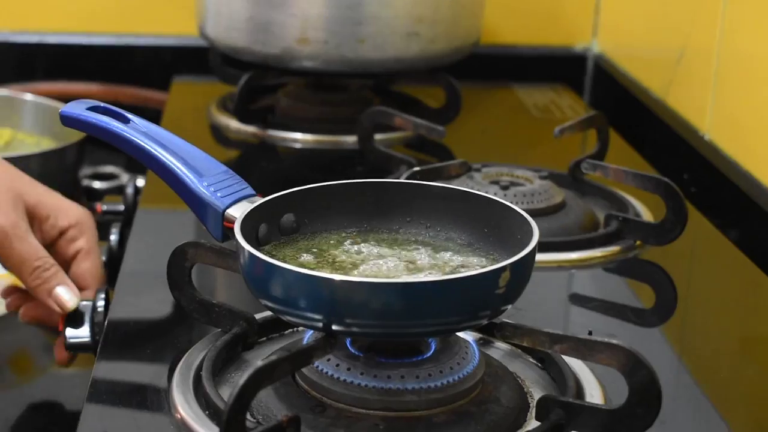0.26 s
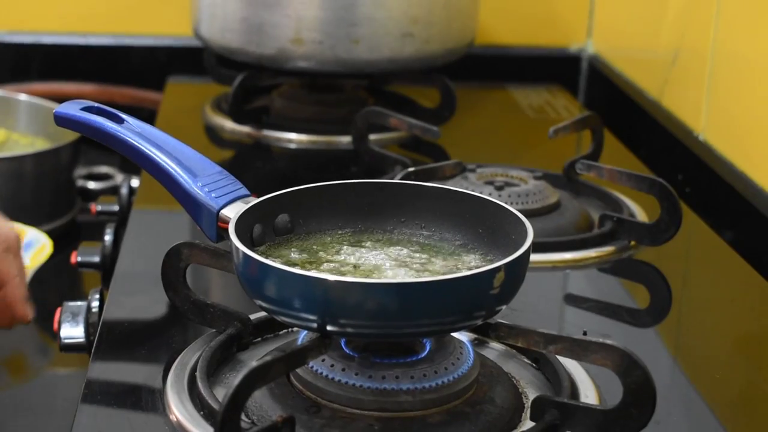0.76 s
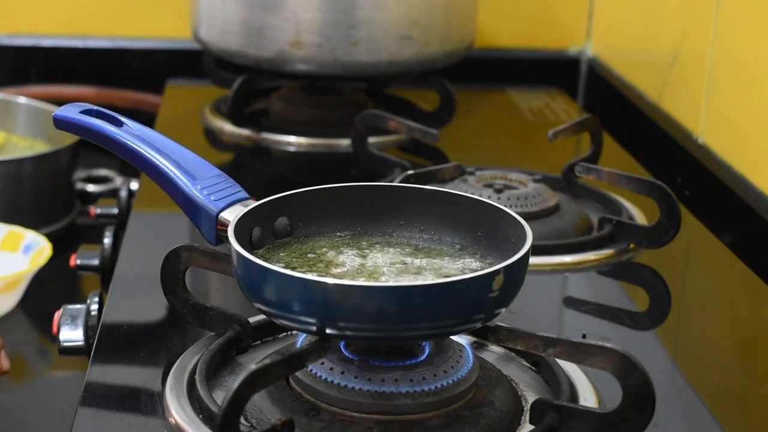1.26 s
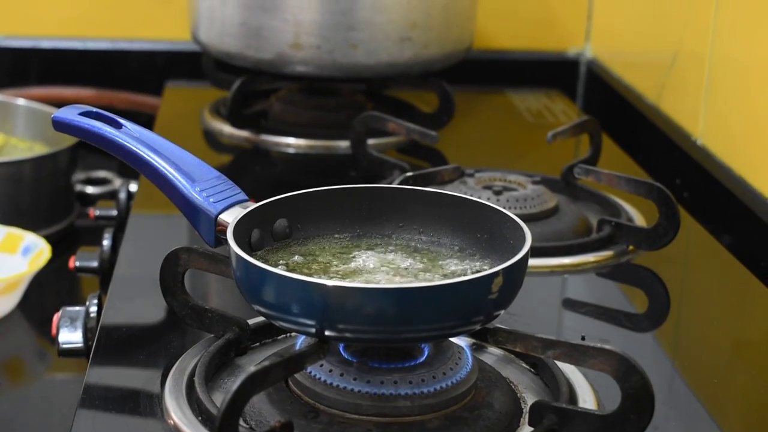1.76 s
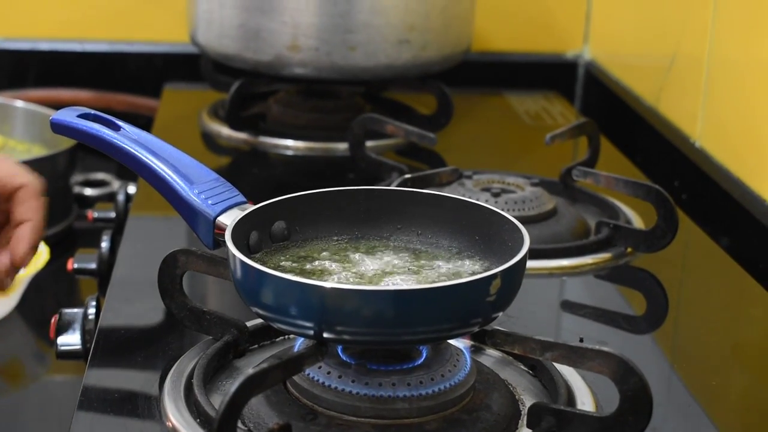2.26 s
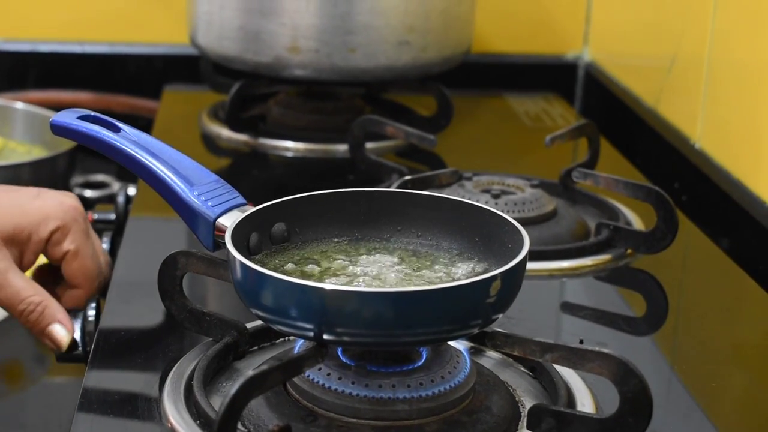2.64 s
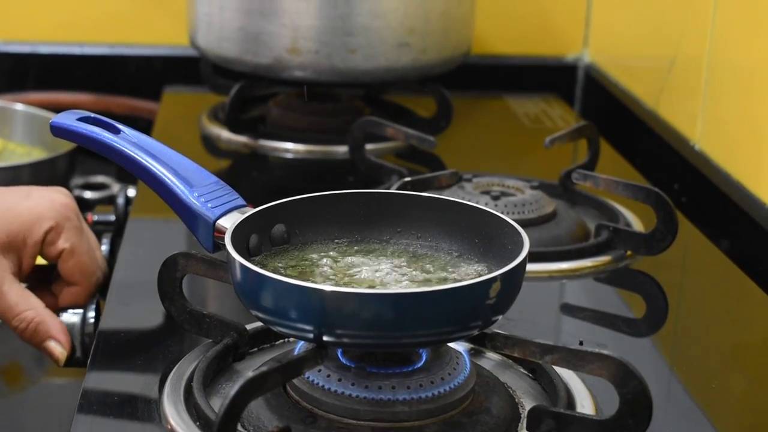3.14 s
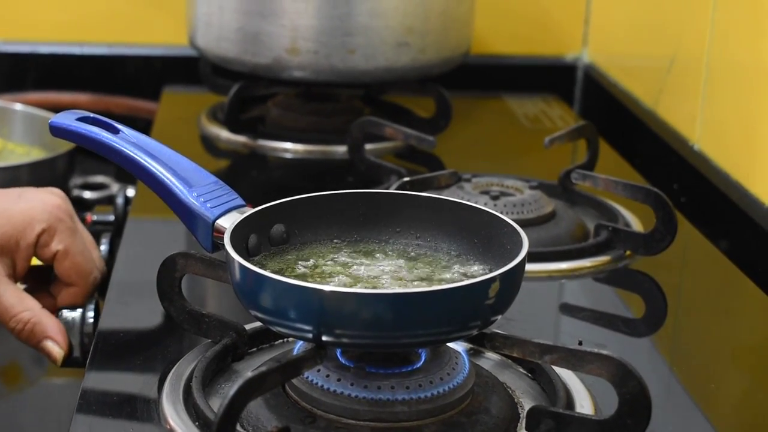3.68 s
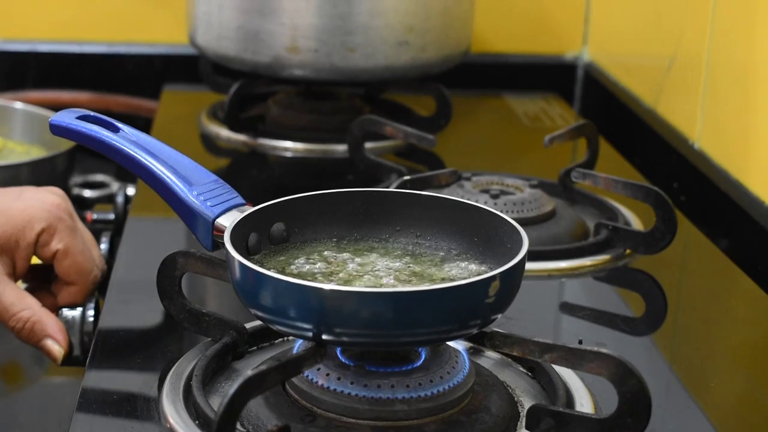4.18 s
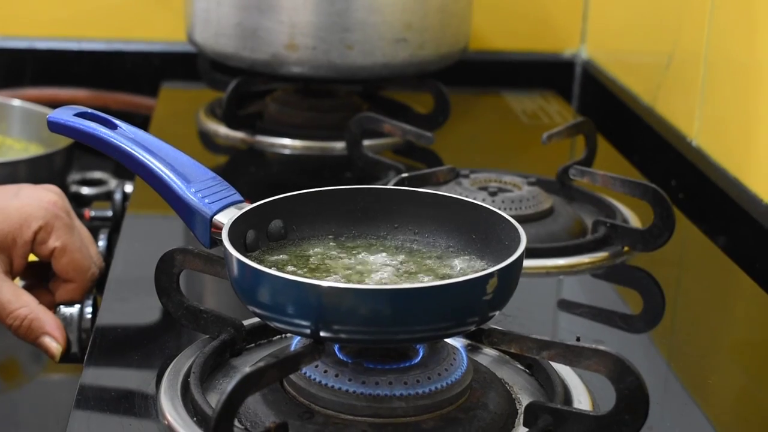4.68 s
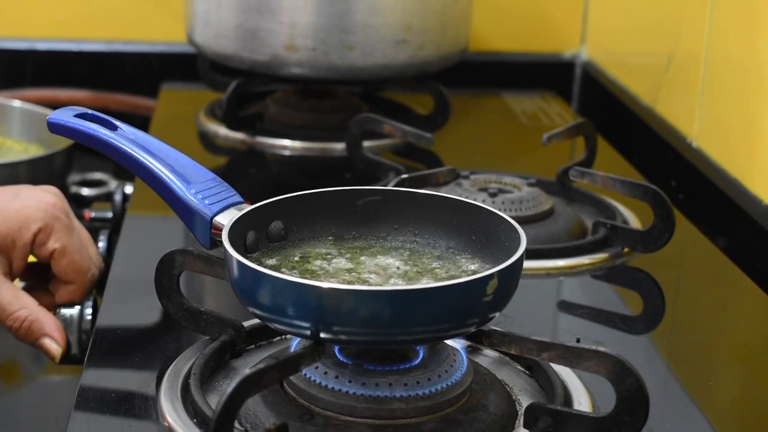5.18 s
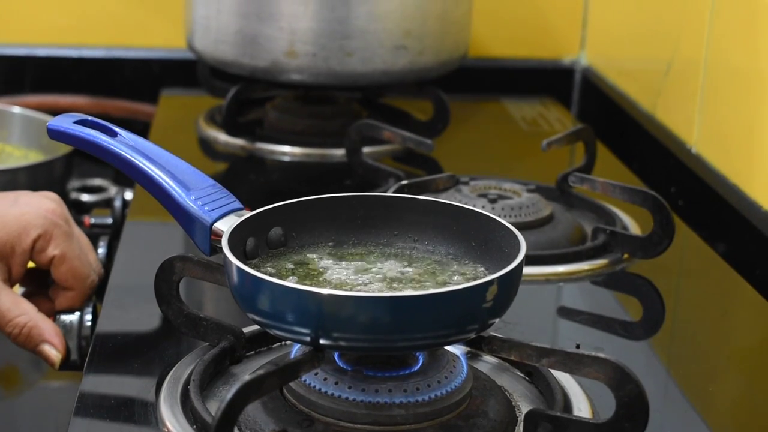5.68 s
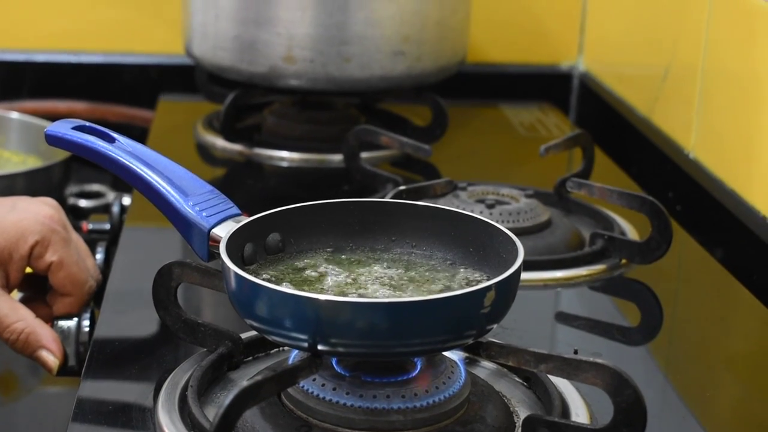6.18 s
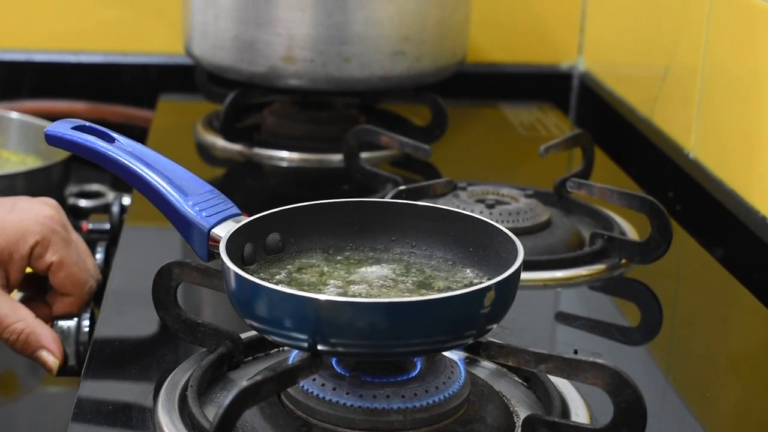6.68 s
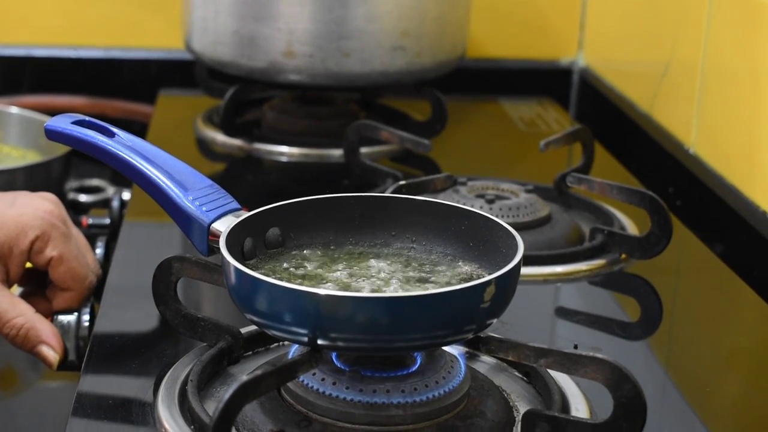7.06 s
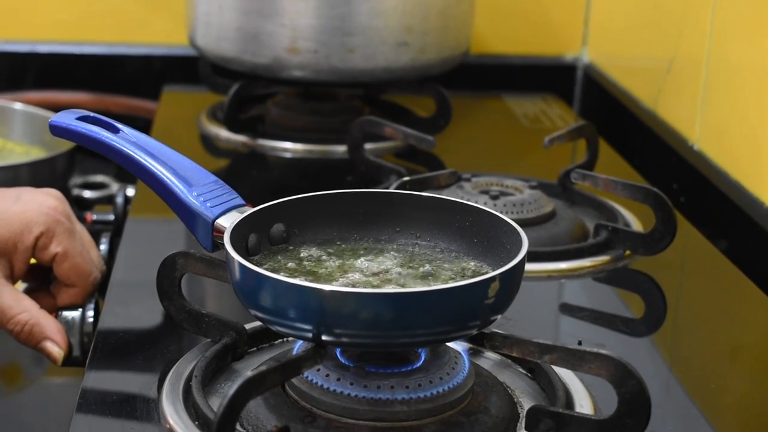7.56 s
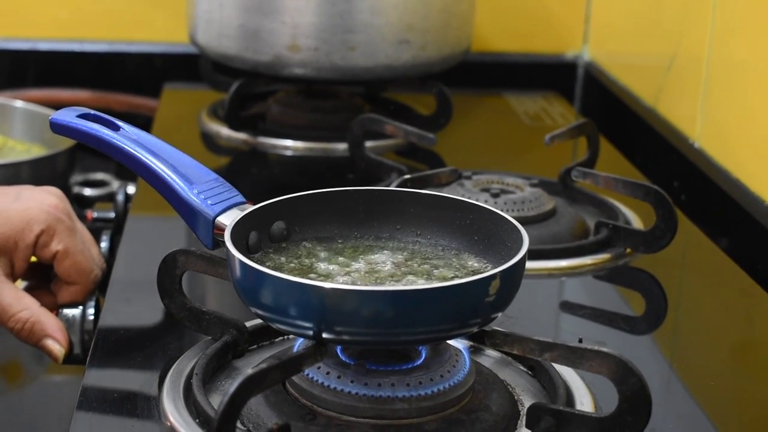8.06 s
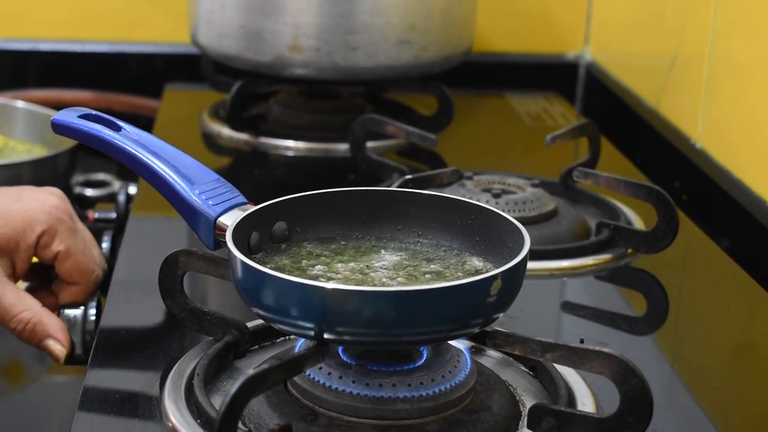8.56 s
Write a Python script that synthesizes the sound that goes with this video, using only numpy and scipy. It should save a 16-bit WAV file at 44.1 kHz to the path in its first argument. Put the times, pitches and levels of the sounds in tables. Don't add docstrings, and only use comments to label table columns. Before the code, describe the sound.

Seeds crackle and pop sharply in hot oil in a small pan, over a soft gas burner hiss in a hard-walled kitchen.

```python
import sys
import numpy as np
from scipy import signal
from scipy.fft import rfft, irfft
from scipy.io import wavfile
from scipy.ndimage import uniform_filter1d

SR = 44100
rng = np.random.default_rng(int(sys.argv[2]) if len(sys.argv) > 2 else 0)


def nominal_scale(level):
    x = np.asarray(level, float) / 20
    return 10 ** x


def dump_mix(stems):
    frames = np.atleast_2d(stems).T
    limited = np.clip(frames, -1, 1)
    pcm = np.round(limited * 32767).astype(np.int16)
    wavfile.write(sys.argv[1], SR, pcm)


N = 388962

# mode_hz, width_hz, level_db
BOWL_MODES = [(1113, 163, -7), (1300, 167, -15.5), (1532, 135, 0.5), (1596.6, 167, 0), (1891, 368, 0.5)]


def evened(x):
    return x / np.sqrt(np.mean(x ** 2) + 1e-20)


def read(points, hz, axis=1):
    columns = np.transpose(points)
    return np.interp(np.log(hz + 1), np.log(columns[0] + 1), columns[axis])


def add(mix, s, sound):
    part = mix[round(s * SR):][:len(sound)]
    part += sound[:len(part)]


def hum(hz, width, count):
    b, a = signal.iirpeak(hz, hz / width, SR)
    settle = SR // 4
    x = signal.lfilter(b, a, rng.standard_normal(count + settle))
    return evened(signal.lfilter(b, a, x)[settle:])


def burner():
    # pitch_hz, level_db (per Hz)
    high_flame = [(900, -5), (1420, -9), (1830, -3), (2300, -9), (4000, -13), (5800, -16), (6150, -8),
                  (6800, -13), (7750, -5), (8500, -10), (10500, -12), (11500, -17), (14500, -21),
                  (16000, -34)]
    # pitch_hz, level_db (per Hz)
    low_flame = [(900, -2), (1300, -2), (2500, -3), (3350, -3), (3650, 2), (4000, -4), (5600, -9),
                 (7800, -7), (10500, -7), (13500, -9), (15200, -13), (16000, -24)]
    # time_s, high_share (0-1), level_db
    flame = [
        (0, 1, -47),
        (.28, 1, -47),
        (.4, 0, -48),
        (8.82, 0, -48),
    ]
    # pitch_hz, level_db (per Hz)
    roar_colour = [(15, -56), (25, -22), (49, -22), (102, -13), (140, -10), (205, -6.5), (248, -2),
                   (291, -6.5), (330, -1), (446, 2.5), (514, -0.5), (603, 2), (695, 3.5), (867, -2),
                   (1100, 1.5), (1430, -31), (2420, -120)]
    # mode_hz, width_hz, level_db
    room_modes = [(198.6, 21, -66), (248.7, 13.5, -67), (342, 33, -66.5), (450.5, 13.3, -61),
                  (712, 14.7, -63)]
    # mode_hz, width_hz, level_db
    jets = [(3494, 74, -52.5), (3700, 180, -50)]
    flicker_db, simmer_from_s, simmer_rise_s, roar_db = 2.5, .45, .15, -52

    t = np.arange(N) / SR
    frames = N // 256 + 5
    hz = np.fft.rfftfreq(1024, 1 / SR)[:, None]
    s, high, level_db = np.transpose(flame)
    high = np.interp(np.arange(frames) * 256 / SR, s, high)
    low = read(low_flame, hz)
    colour = nominal_scale(low + high * (read(high_flame, hz) - low)) * (hz > 950)
    colour = colour / np.sqrt((colour ** 2).mean(0))
    a, b = rng.standard_normal((frames, 513, 2)).T
    hiss = evened(signal.istft((a + 1j * b) * colour, nperseg=1024, noverlap=768)[1][:N])

    modes = sum(nominal_scale(db) * hum(f, width, count=N) for f, width, db in room_modes)
    power = uniform_filter1d(modes ** 2, size=3000) - np.mean(modes ** 2)
    flicker = nominal_scale(flicker_db * (evened(uniform_filter1d(power, size=1500)) - .5))
    simmer = sum(nominal_scale(db) * hum(f, width, count=N) for f, width, db in jets)
    modes += simmer * flicker * np.clip((t - simmer_from_s) / simmer_rise_s, 0, 1)

    low_hz = np.fft.rfftfreq(N, 1 / SR)
    roar = rfft(rng.standard_normal(N)) * nominal_scale(read(roar_colour, low_hz)) * (low_hz < 1000)
    roar = evened(irfft(roar, N))
    return hiss * nominal_scale(np.interp(t, s, level_db)) + nominal_scale(roar_db) * roar + modes


def ring(modes, t, chance, rise_s, tilt_db=0):
    x = 0
    for k, (hz, width, db) in enumerate(modes):
        cycles = hz * t + k / 2 + (chance[k] - .5) / 4
        x = x + nominal_scale(db + tilt_db * k) * np.exp(-np.pi * width * t) * np.sin(2 * np.pi * cycles)
    x = x * -np.expm1(-t / rise_s)
    return x / np.linalg.norm(x)


def pop(bowl_db, hz, bubble_db, puff_db, crack_db, dry_db, chance):
    # mode_hz, width_hz, level_db
    rim_modes = [(2320, 280, 0.5), (3586, 690, 7), (4070, 910, 9.5)]
    # mode_hz, width_hz, level_db
    puff_modes = [(5180, 3270, 6.5), (7175, 1430, 2), (6970, 2650, 7.5)]
    # mode_hz, width_hz, level_db
    crack_modes = [(8840, 2930, 2.5), (11170, 1560, -7), (12260, 1740, -12), (14400, 1300, -30.5)]

    def highpassed(x, order, edge_hz):
        return signal.lfilter(*signal.butter(order, edge_hz, "high", fs=SR), x)

    t = np.arange(900) / SR
    stretch = [1 + 0.12 * (chance[5] - .5), 1, 1]
    tighten_db = 0.39 * np.clip(bowl_db + 9, -4, 12)
    rings = [(f, width, db - (abs(f - 1560) > 150) * tighten_db) for f, width, db in BOWL_MODES]
    rings = np.multiply(rings, [1 + .07 * (chance[5] - .5), 1, 1])
    bowl = nominal_scale(bowl_db + 2.0) * ring(rings, t, chance, .0014, 2 * chance[0] - 1)
    width_hz = .14 * hz + .6 * max(hz - 4000, 0)
    bubble = nominal_scale(bubble_db - 0.3) * ring([(hz, width_hz, 0)], t, chance + 1, .0002)
    rim = nominal_scale(bubble_db - 5.0) * ring(rim_modes, t, chance, 0.00013)
    puff = nominal_scale(puff_db + 2.5) * ring(np.multiply(puff_modes, stretch), t, chance, .0001, dry_db)
    crack = nominal_scale(crack_db + 8.0) * ring(np.multiply(crack_modes, stretch), t, chance[1:], .00006, dry_db)
    husk = highpassed(puff - highpassed(crack, 1, 6000), 2, 3000)
    steam = highpassed(bubble + rim, 2, 0.55 * hz)
    return bowl - steam + husk


def seeds():
    # start_s,
    # bowl_db, bubble_db, puff_db
    plops = [(.4892, -11.5, -14, -10.5), (.5191, -16, -6.5, -27), (.5847, -5, -5, -19),
             (.8741, -13.5, -10, -8), (.9206, -11, -4.5, -16), (1.2143, -8.5, -6, -5.5),
             (1.242, -14, -5.5, -33), (1.4947, -6, -4, -8.5), (1.5105, -16, -9, -37),
             (1.9238, -16, -13, -20), (2.0329, -6.5, -5, -13), (2.8099, 5.5, 0.5, -7),
             (2.8338, -27, -25, -33), (2.9932, -13, -16, -16), (3.6288, -9.5, -6, -18),
             (3.8167, -22, -13, -17), (3.9937, -11, -11.5, -16), (4.1917, -7.5, -7, -20),
             (4.4825, -2, -4, -10), (4.878, -7.5, -6, -21), (5.1153, -15, -10, -17),
             (6.2958, -12.5, -18, -21), (6.3549, -11.5, -10, -26), (6.6468, -9, -5, -23),
             (6.907, 2.5, -5, -11), (7.1125, -10.5, -13, -40), (7.6895, -2, -3, -14),
             (7.7413, -6.5, -3.5, -20), (7.8328, -6, -9.5, -25), (8.5141, -3, -10, -28)]
    # start_s, bowl_db, bubble_db, puff_db
    spits = [(.3007, -30, -31, -8.5), (2.9154, -25, -34, -17), (.8368, -16.5, -33, -20),
             (.961, -5, -31, -32), (1.0108, -11.5, -40, -19), (1.451, -10, -14, -43),
             (1.8214, -23, -20, -42), (1.8521, -21, -17, -16.5), (2.1318, -25, -28, -15.5),
             (2.1717, -7, -11.5, -21), (2.4575, -20, -12, -16), (3.2714, -3, -22, -9),
             (3.418, -21, -37, -11), (3.5197, -34, -24, -47), (8.2233, -11.5, -20, -19),
             (4.2249, -8.5, -40, -27), (4.354, -16.5, -20, -14), (4.7245, -18, -35, -24),
             (4.8392, -15, -16.5, -19), (5.1776, -9, -40, -14), (5.4734, -18, -14, -16.5),
             (5.7017, -42, -13, -7.5), (6.2554, -17, -18, -17), (6.4538, -33, -12.5, -14),
             (6.8336, -18.5, -15, -29), (7.0276, -6.5, -14, -30), (7.1997, -20, -22, -39),
             (7.2493, -16, -19, -20), (8.24, -31, -18, -41), (8.8053, -12, -27, -12)]
    # start_s, pitch_hz, bowl_db, bubble_db
    pops = [(0.5742, 2860, -4, -4.5), (0.6008, 2960, -2.5, -6.5), (0.952, 3300, -23, -5),
            (1.077, 3350, -15, -13), (1.3671, 3390, -1, 9.5), (1.3902, 3350, -5, -1.5),
            (1.576, 3480, -7.5, -14), (2.1488, 3420, -16, -11), (2.2021, 3540, -12, 3),
            (2.3392, 3400, -12, -5.5), (2.3738, 2930, -5.5, -7), (2.5895, 3140, -8, -19),
            (2.6018, 3230, -33, -11), (3.143, 3070, -4, 5), (3.253, 3540, -6.5, -3), (3.508, 3430, -0.5, 2),
            (3.691, 3460, -9.5, -9.5), (3.7995, 3480, -13, -14), (4.1475, 3390, -11.5, -8),
            (4.26, 3580, -37, -1), (5.1509, 3180, -15, 2), (5.422, 3140, -12, -15), (5.615, 3330, -15, -11),
            (6.14, 3360, -16, -9.5), (6.876, 3430, -4, -7), (7.6227, 3420, -3, -6.5), (8.098, 3430, -15, 2),
            (8.238, 3400, -1.5, -11.5), (8.4725, 3430, -11, -11.5), (8.7676, 3450, -31, -6.5),
            (.4442, 4770, -18.5, -6.5), (.711, 4200, -6.5, -12), (.8953, 4400, -14, -11.5),
             (1.1065, 4370, -4, -1.5), (1.2783, 3740, -7.5, -8), (1.301, 4900, -9, -0.5),
             (1.7461, 4600, -13.5, -6.5), (1.9568, 4070, -13.5, 2.5), (2.0159, 3900, 0, -8.5),
             (2.7581, 3570, -7.5, -10), (2.9154, 3550, -12, -1), (3.2973, 4320, -7.5, 5.5),
             (3.9615, 4250, -3.5, -6.5), (4.331, 3270, -16, -8), (4.6056, 4300, -8, -8.5),
             (4.7672, 3550, -11, -8), (5.0433, 3970, -16.5, -5), (5.2377, 4100, -17.5, 1),
             (5.289, 3720, -20, -11), (5.3626, 5060, -12, -7), (5.7164, 4630, -10.5, 1),
             (5.8, 3950, -8, -13), (6.0003, 4100, -4, -3.5), (6.101, 3550, -8, 0), (6.2092, 3700, -7, -8.5),
             (6.548, 3020, -13, -11), (6.993, 3530, -3.5, -7), (7.0379, 4220, -30, -3.5),
             (7.494, 4000, -8.5, -5), (8.4256, 4260, -11, -12)]
    # start_s, puff_db, crack_db, brightening_db (from ring to ring)
    splits = [(.4442, -17, -9.5, 6.5), (0.546, -17, -23, -9), (1.301, -3, -17, -5), (1.367, 2, -18, 3.5),
              (1.39, -20, -10, -7), (1.536, -9.5, -36, -17), (1.7459, -17, -18.5, 2),
              (1.9574, -20, -10.5, 0), (2.602, -13.5, -30, -3), (2.7573, -6, -16, -1), (3.143, -21, -5, 3),
              (3.253, -7, -18, -4), (3.2972, -3.5, -6, 7.5), (3.5082, -8, -10.5, -3),
              (4.084, -10, -36, -4.5), (4.2601, -15, -12, 5), (4.3815, -1, 1, 4.5), (4.873, -26, -3.5, 6.5),
              (5.044, -3.5, -28, 2), (5.2377, -12, -10.5, 4.5), (5.3885, -3, -4, 4.5),
              (5.7164, -2.5, -17, 3.5), (6.0003, -8, -16.5, -3), (6.8752, -6.5, -16, -5),
              (7.0376, -1, -2, -3), (7.6231, -15, -14, -4), (8.0016, 4, -4, 1.5), (8.098, -1, -7, 0),
              (8.1169, -13, 2.5, 5.5), (8.7672, -10, -25, 8)]
    plop_hz, spit_hz, silent_db = 2360, 3550, -80
    husk_puff_db, husk_crack_db, wet_tilt_db = -11, -19, 0.5
    husk_follows = 0.69

    rows = []
    for table, hz in ((plops, plop_hz), (spits, spit_hz)):
        for s, bowl, bubble, puff in table:
            crack = husk_crack_db + husk_follows * max(bowl, bubble)
            rows.append((s, bowl, hz, bubble, puff, crack, wet_tilt_db))
    for s, hz, bowl, bubble in pops:
        follow = husk_follows * max(bowl, bubble)
        rows.append((s, bowl, hz, bubble, husk_puff_db + follow, husk_crack_db + follow, wet_tilt_db))
    split_s = np.transpose(splits)[0]
    rows = [(*row[:4], silent_db, silent_db, 0) if abs(split_s - row[0]).min() < .002 else row
            for row in rows]
    rows += [(s, silent_db, spit_hz, silent_db, *husk) for s, *husk in splits]

    out = np.zeros(N)
    for (s, *parts), chance in zip(rows, rng.random((len(rows), 6))):
        add(out, s, pop(*parts, chance))
    return out


def sizzle():
    # time_s, level_db
    loudness = [
        (.4, -80),
        (.6, -50),
        (1.5, -49),
        (3, -52),
        (6, -53),
        (8.82, -55),
    ]
    bursts_per_s = 450
    size = nominal_scale(3.8 * np.minimum(rng.exponential(1, N), 3.5)) * (rng.random(N) < bursts_per_s / SR)
    kind = rng.integers(0, 12, N)
    out = np.zeros(N)
    for k, c in enumerate(rng.random((12, 8))):
        burst = pop(3 - 12 * c[6], 2300 + 2500 * c[7], 0, -6.0, -9.0, -.5, c)
        out += signal.oaconvolve(size * (kind == k), burst)[:N]
    return evened(out) * nominal_scale(np.interp(np.arange(N) / SR, *np.transpose(loudness)))


def droplets():
    # start_s, pitch_hz, level_db
    ticks = [(.5085, 6500, -20), (.518, 6300, -24), (0.569, 10000, -17), (.658, 10300, -14),
             (.7862, 4970, -12), (0.787, 6300, -17), (.805, 12500, -26), (0.9614, 8100, -13),
             (1.7461, 6800, -13), (1.895, 5100, -21), (1.9574, 5700, -7), (2.198, 7200, -25),
             (2.4575, 6450, -18), (2.578, 11500, -28), (2.9154, 4920, -0.5), (2.95, 10500, -17),
             (2.958, 8300, -21), (3.143, 6450, -6), (3.2557, 6200, -10), (3.291, 3700, -8),
             (3.2973, 4770, -18), (4.023, 6040, -16), (4.0234, 12000, -16), (4.074, 4000, -20),
             (4.073, 7500, -16), (4.4895, 5500, -20), (4.5153, 7920, -12.5), (5.2377, 5860, -15),
             (5.246, 9000, -18), (5.423, 3100, -13), (5.9665, 6700, -13), (5.9665, 10800, -21),
             (6.1008, 5800, -10), (6.2967, 6350, -15), (6.354, 10300, -21), (6.5212, 7340, -19),
             (6.555, 3980, -7.5), (6.5546, 5600, -25), (6.592, 11000, -21), (6.6464, 6900, -20),
             (7.345, 13500, -30), (7.494, 10800, -11), (7.494, 12500, -15), (7.494, 5850, -13),
             (7.6895, 6100, -10), (7.69, 2950, -17), (7.7413, 3970, -8), (7.8138, 11300, -26),
             (7.885, 9000, -27), (8.001, 2980, -13), (8.0972, 4860, -7), (8.4253, 4160, -7),
             (8.4725, 11000, -23), (8.6728, 9500, -25), (8.7675, 7300, -9), (0.584, 6300, -15),
             (1.012, 6700, -25), (4.1475, 6000, -8), (3.69, 5430, -22), (2.6016, 6260, -27)]
    # start_s, pitch_hz, level_db
    twins = [(2.7581, 7050, -7), (2.7588, 2880, -12), (2.9154, 3500, -5.5), (3.143, 6900, -3),
             (3.143, 3500, -7), (3.252, 1740, -7.5), (3.253, 4400, -5), (3.2972, 4670, 4.5),
             (3.2973, 5720, 3.5), (3.2981, 7000, 0), (3.297, 13600, -11), (3.9617, 1760, -5.5),
             (4.2599, 5800, -7), (4.26, 8940, -15), (4.48, 3480, -8), (4.7672, 5800, -8.5),
             (5.044, 4700, -5), (5.1493, 3430, 3.5), (5.363, 9100, -9), (5.7163, 4570, 4),
             (5.7164, 8500, -7), (5.7164, 5550, -2.5), (6.0003, 1520, -21), (6.2092, 2480, -10),
             (6.2092, 5550, -13), (6.3549, 3540, -16), (6.3545, 1300, -10), (6.993, 11000, -19),
             (7.035, 1510, -8), (7.6224, 1730, -3), (7.6896, 1560, 2), (7.742, 1558, 0.5),
             (8.098, 3260, -11), (8.238, 1720, -6), (8.238, 3560, -7), (8.514, 1670, -8.5),
             (8.7675, 1820, -25), (2.2021, 4600, -27), (6.8752, 13000, -24), (1.3906, 9000, -14),
             (1.3906, 14500, -24), (1.853, 4760, -13), (4.3815, 15100, -15), (4.873, 15200, -21),
             (5.3885, 14800, -8), (8.1169, 15200, -8), (.4442, 15000, -20), (8.8053, 1620, 0.5),
             (1.077, 3570, -9.5), (.952, 3270, -7), (1.301, 4800, 0.5), (5.7165, 1600, -12)]
    # start_s, level_db
    bloops = [(.538, -5.5), (2.1965, -4.5), (3.935, -18), (3.967, 1.5), (5.3839, -2.5), (5.608, -18),
              (7.999, -16), (8.2643, -11), (8.7675, -31), (6.521, -21), (2.164, -14)]
    tick_width, twin_width = 0.056, 0.059

    def levels(hz, db):
        return nominal_scale(db + np.array([0, -4 * (4300 < hz < 7200)]))

    out, t, even = np.zeros((N, 2)), np.arange(900) / SR, np.full(3, .5)
    for s, hz, db in ticks:
        add(out, s, np.outer(ring([(hz, tick_width * hz, 0)], t, even, .0001), levels(hz, db)))
    for s, hz, db in twins:
        add(out, s, np.outer(ring([(hz, twin_width * hz, 0)], t, even, .5 / hz), levels(hz, db)))
    for s, db in bloops:
        add(out, s, nominal_scale(db) * ring(BOWL_MODES[2:], t, even, 0.00026, -2.8)[:, None])
    return out.T


def over_rim(x):
    # pitch_hz, width_hz, level_db
    bands = [(1080, 400, -3), (1560, 400, 1.5), (2400, 600, -3)]
    return x + sum((nominal_scale(db) - 1) * signal.lfilter(*signal.iirpeak(hz, hz / width, SR), x)
                   for hz, width, db in bands)


def kitchen(x, tail_db, start_s, turn_s, count):
    # pitch_hz, t60_s, level_db
    decay = [(1100, .38, -1), (1550, .38, -8), (1950, .37, -2), (2450, .37, 1), (3500, .36, 0),
             (7000, .33, -3), (14700, .27, -3)]
    # delay_ms, level_db
    hard_echoes = [(8.1, -10), (9.8, -15), (11.8, -13), (13.4, -15), (15.6, -16), (18.4, -16), (19.2, -16),
                   (25.5, -17), (28, -17)]
    # delay_ms, level_db
    dull_echoes = [(27, -5), (39, -13)]
    scatter_db, scatter_from_s, scatter_to_s = 6, .0009, .005
    stove_ms, stove_db = .615, -5

    at, t_s = np.arange(0, SR // 2 - 8, 8), np.arange(N) / SR
    out, echoes = np.zeros(N), np.zeros(SR // 20)
    bright = signal.butter(2, 2200, "high", fs=SR)
    age = np.arange(SR // 2) / SR
    scatter = np.clip(1 - age / scatter_to_s, 0, 1) ** .5
    scatter = nominal_scale(scatter_db) * (age > scatter_from_s) * scatter
    for k in range(count):
        taps = np.zeros(SR // 2)
        taps[at + rng.integers(0, 8, len(at))] = rng.choice([-1., 1.], len(at))
        hz, t, z = signal.stft(taps, SR, nperseg=256)
        fall_db = read(decay, hz, axis=2)[:, None] - 60 * t / read(decay, hz)[:, None]
        tail = signal.istft(z * nominal_scale(fall_db), SR, nperseg=256)[1][:len(taps)]
        tail = tail * np.clip(age / start_s, 0, 1) ** 2 + signal.lfilter(*bright, tail) * scatter
        share = np.sqrt(2 / count) * np.cos(np.pi * (t_s / turn_s + k / count))
        out += signal.oaconvolve(x * share, nominal_scale(tail_db) * tail / np.linalg.norm(tail))[:N]
    for k, (ms, db) in enumerate(hard_echoes):
        add(echoes, ms / 1000, (-1) ** k * nominal_scale(db) * np.ones(1))
    echoes = signal.lfilter(*bright, echoes)
    add(echoes, stove_ms / 1000, nominal_scale(stove_db) * np.ones(1))
    for ms, db in dull_echoes:
        add(echoes, ms / 1000, nominal_scale(db) * np.hanning(14) / np.hanning(14).sum())
    return out + signal.oaconvolve(x, echoes)[:N]


def hidden():
    # start_s, pitch_hz, level_db
    bubbles = [(5.15, 3450, 2), (3.143, 3080, 8), (5.7164, 4150, -2), (5.7166, 3400, -6), (8.001, 3100, -7),
               (3.2973, 4100, -3), (5.0433, 3700, -8), (5.2377, 4300, -6), (1.3675, 1080, -9),
               (4.481, 4200, -11), (2.2021, 4300, -9), (.5847, 2900, -7), (.538, 1050, -11),
               (3.253, 4000, -6), (1.2143, 3600, -12), (1.2143, 10500, -17), (6.2092, 3000, -12),
               (.961, 1050, -13), (1.011, 7200, -19), (1.7461, 5800, -19), (6.0003, 1100, -10),
               (8.238, 2400, -10), (7.494, 8200, -17), (6.6468, 2500, -15)]
    # delay_ms, level_db
    reflections = [(4.2, -9), (9.5, -12), (16.5, -9), (19.5, -11), (25.3, -7.5), (43, -14), (49, -13)]
    out, slaps, t = np.zeros(N), np.zeros(SR // 10), np.arange(900) / SR
    for s, hz, db in bubbles:
        add(out, s, nominal_scale(db) * ring([(hz, 0.14 * hz, 0)], t, [.5], .5 / hz))
    for ms, db in reflections:
        add(slaps, ms / 1000, nominal_scale(db) * np.ones(1))
    out = signal.sosfilt(signal.butter(4, 880, "high", fs=SR, output="sos"), out)
    tail = kitchen(out, tail_db=-1.0, start_s=0.0072, turn_s=0.93, count=3)
    return signal.oaconvolve(out, slaps)[:N] + tail


def far_motor():
    # start_s, length_s, pitch_hz, width_hz, level_db
    motor = (1.45, 1.3, 140, 14, -69)
    s, length, hz, width, db = motor
    out = np.zeros(N)
    drone = hum(hz, width, count=N)[:round(length * SR)]
    add(out, s, nominal_scale(db) * drone * signal.windows.tukey(len(drone), .4))
    return out


def knob():
    # start_s, level_db, pitch_hz, width_hz, t60_s
    knocks = [
        (1.46, -53, 590, 2, 3),
        (2.045, -36, 290, 130, .2),
        (2.065, -42, 240, 60, .35),
        (2.075, -39, 440, 70, .17),
        (2.06, -46, 200, 90, .3),
        (2.9, -52, 150, 150, .3),
    ]
    out, t = np.zeros(N), np.arange(SR // 4) / SR
    for s, db, hz, width, t60 in knocks:
        knock = nominal_scale(db - 60 * t / t60) * hum(hz, width, count=len(t))
        add(out, s, knock * signal.windows.tukey(len(t), .1))
    return out


def scene():
    no_bass = signal.butter(4, 880, "high", fs=SR, output="sos")
    oil, sent = signal.sosfilt(no_bass, seeds() + droplets() + sizzle())
    mix = nominal_scale(-1.5) * over_rim(oil) + kitchen(sent, tail_db=1.0, start_s=.006, turn_s=1.3, count=3)
    mix = mix + burner() + knob() + hidden() + far_motor()
    return np.array([mix, mix])


def top_cut(x):
    return signal.sosfilt(signal.butter(12, 16830, fs=SR, output="sos"), x)


def record(dry):
    # start_s, level_db
    thumps = [
        (0.301, -45),
        (4.381, -40),
        (4.871, -42),
        (5.388, -43),
        (7.037, -33),
    ]
    edge_hz, top_hz, top_opens_db = 15780, 16700, -50

    def lowpassed(x, hz):
        taps = signal.firwin(511, hz, window=("kaiser", 8), fs=SR)
        return signal.oaconvolve(x, taps[None], "same")

    excess = dry - np.clip(dry, -.99, .99)
    full = dry - signal.lfilter(*signal.butter(2, 500, "high", fs=SR), excess)
    for s, db in thumps:
        add(full.T, s, nominal_scale(db) * np.hanning(40)[:, None])
    body = lowpassed(full, edge_hz)
    top = lowpassed(full, top_hz) - body
    opens = uniform_filter1d(top ** 2, size=128) > nominal_scale(2 * top_opens_db)
    return top_cut(body + top * uniform_filter1d(opens * 1., size=128))


dry = scene()
out = record(dry)
dump_mix(out)
```